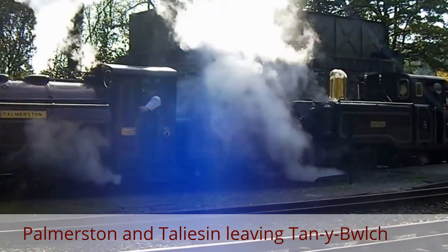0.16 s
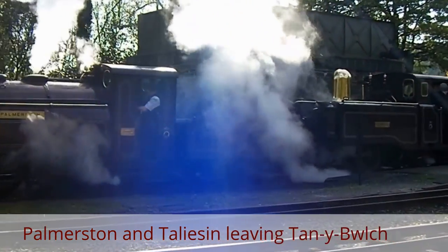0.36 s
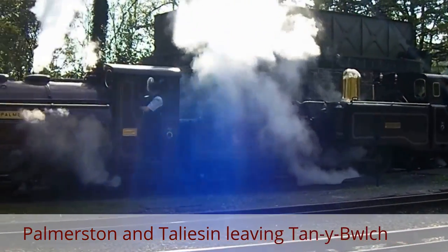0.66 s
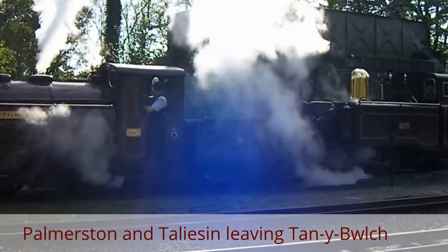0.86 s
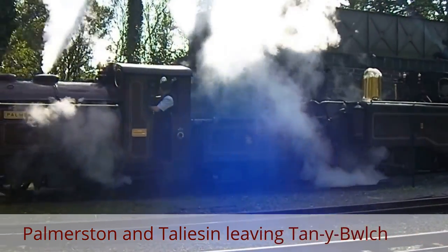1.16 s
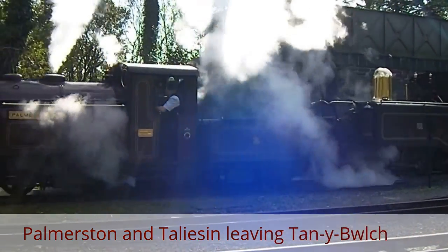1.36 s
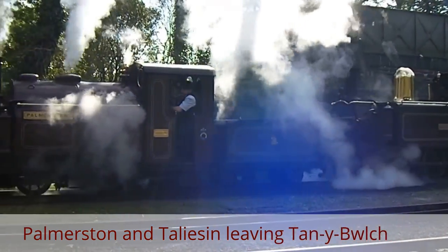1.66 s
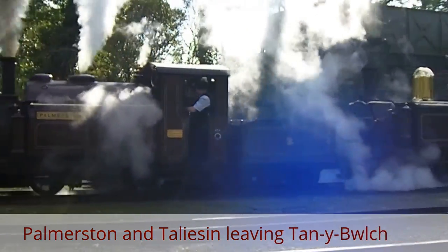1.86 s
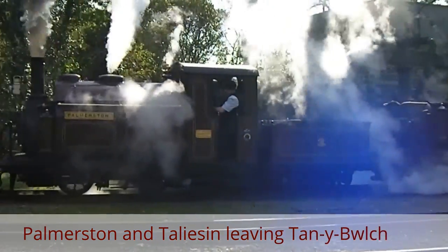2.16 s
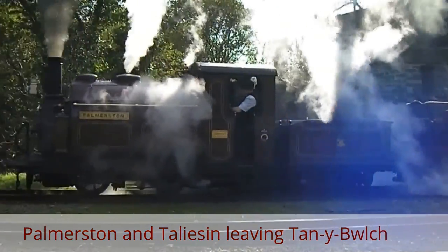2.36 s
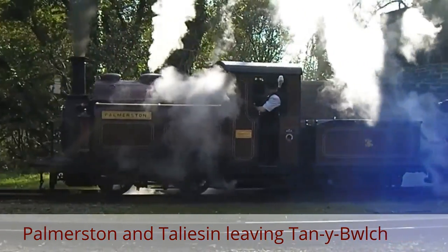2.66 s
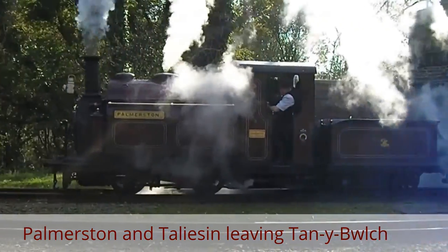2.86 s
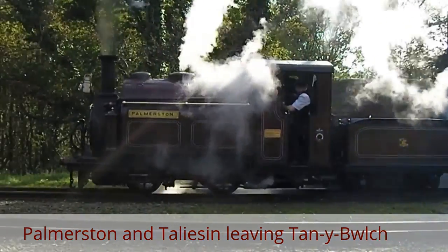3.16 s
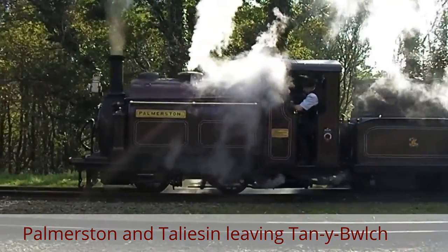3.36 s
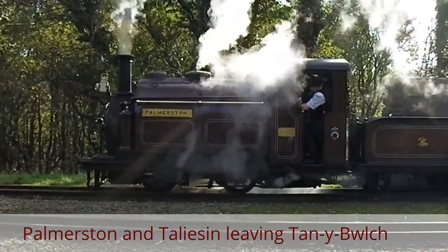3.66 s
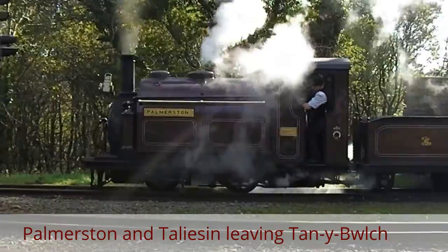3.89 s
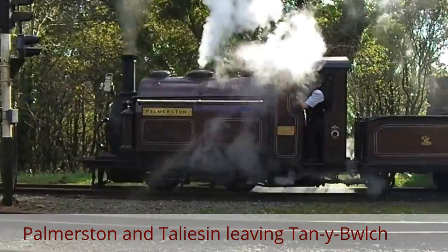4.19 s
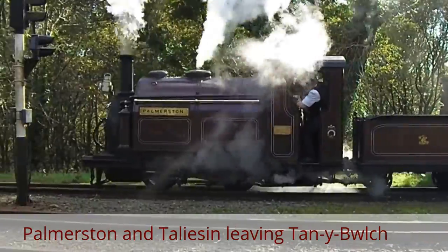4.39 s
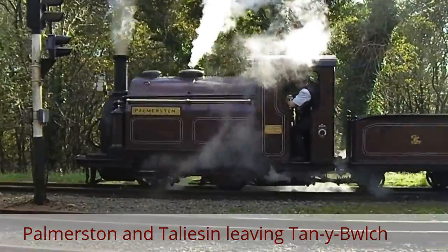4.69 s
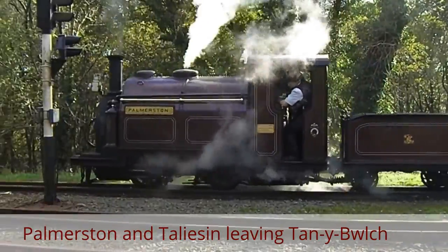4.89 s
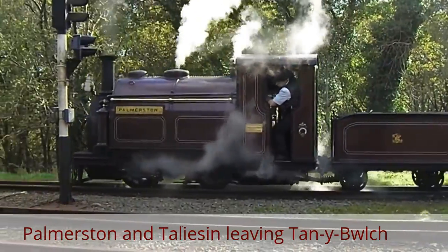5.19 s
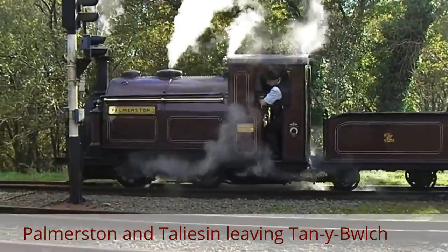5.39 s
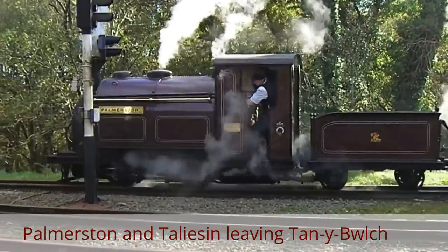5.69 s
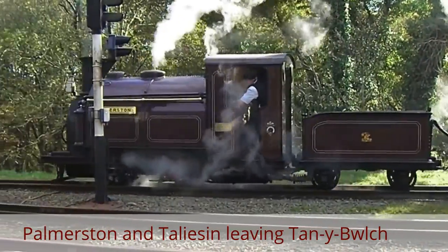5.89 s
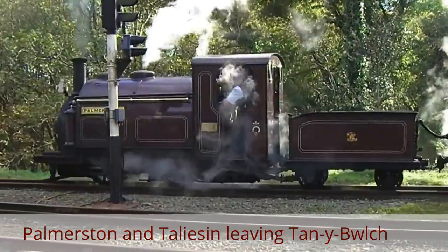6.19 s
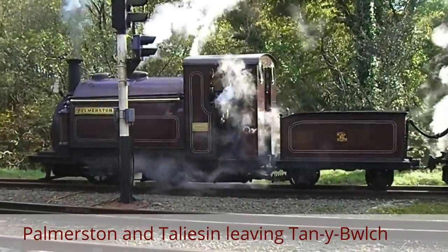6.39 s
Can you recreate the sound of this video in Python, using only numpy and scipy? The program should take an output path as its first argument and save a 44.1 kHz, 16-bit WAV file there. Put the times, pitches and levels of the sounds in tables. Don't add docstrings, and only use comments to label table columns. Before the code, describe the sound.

Two small steam engines start a train close by: dense steam hiss, a rapid slipping flurry of chuffs, then steady overlapping exhaust beats.

```python
import sys
import numpy as np
from scipy import signal
from scipy.fft import rfft, irfft, next_fast_len
from scipy.io import wavfile
from scipy.ndimage import uniform_filter1d

SR = 44100
rng = np.random.default_rng(int(sys.argv[2]) if len(sys.argv) > 2 else 0)


def voltage_ratio(decibels):
    exponent = np.asarray(decibels, float) / 20
    return 10 ** exponent


def master(y):
    cut = np.clip(np.atleast_2d(y).T, -1, 1)
    pcm = np.round(cut * 32767)
    wavfile.write(sys.argv[1], SR, pcm.astype(np.int16))


N = 288414
SIZE = next_fast_len(N)
HZ = np.maximum(np.arange(SIZE // 2 + 1) * SR / SIZE, 1)
T = np.arange(N) / SR

# [peak t/s, level/dB, fall t/s, rasp level/dB]
BEATS_LEAD = [(.062, -37.5, 0.041, -1), (.407, -33.5, 0.05, -3.5), (.878, -33.5, .048, 1.5),
              (1.108, -38.5, 0.061, 0), (2.451, -42, .025, -1), (2.926, -38, 0.048, -4),
              (3.444, -35.5, 0.038, -8), (3.94, -35.5, 0.045, -2.5), (4.375, -34, 0.068, 0),
              (4.545, -51, 0.027, 6), (4.815, -34, 0.036, -2), (5.238, -34, 0.041, -1.5),
              (5.671, -32.5, 0.044, 0), (6.075, -30.5, 0.037, 0), (6.438, -30, 0.026, -3.5)]
BEATS_REAR = [(1.334, -29.5, 0.022, 4.5), (1.485, -28.5, 0.03, 1.5), (1.609, -28.5, .033, 0.5),
              (1.716, -29.5, 0.032, 1), (1.828, -32, 0.032, 5), (1.933, -30.2, 0.035, 1.5),
              (2.049, -39.5, 0.046, 7), (2.204, -35, .021, -14), (2.375, -43.5, 0.071, -3),
              (2.87, -41, 0.057, 0), (3.296, -36, 0.042, -7), (3.648, -35.5, 0.046, -2),
              (4.049, -33.5, 0.041, -2.5), (4.41, -30, 0.03, -4), (4.769, -35, 0.088, 1),
              (5.084, -33.5, 0.039, -1.5), (5.435, -34, 0.048, 0), (5.757, -29, 0.043, -2),
              (6.045, -31.5, 0.032, -2), (6.353, -30, 0.032, -4)]
# [f/Hz, width f/Hz, level/dB]
CHIMNEY_LEAD = [(394, 115, 2), (660, 215, 0.5), (1200, 110, -6), (900, 870, -12)]
CHIMNEY_REAR = [(412, 91, 4.5), (670, 190, 0.5), (1058, 150, -2.5), (990, 1300, -10)]
THUMP = [(98, 66, -2), (185.6, 165, 1.5)]
RASP = [(1600, 170, 2.5), (2070, 1430, 1), (2840, 550, -5), (5300, 17000, -5)]
# [opens t/s, shuts t/s, cock level/dB, valve level/dB, left-right level/dB]
BLOWS_REAR = [
    (-.1, 0.09, -29.5, -32.5, 3),
    (0.083, 0.393, -31.5, -31.5, 5.5),
    (.39, 0.45, -27.5, -38, 1),
    (0.466, .66, -30.5, -32, 2),
    (0.659, 0.717, -27.5, -27.5, -1.5),
    (0.712, 1.168, -26, -24, -2),
    (1.18, 1.261, -19, -24, -6.5),
    (1.276, 1.495, -19, -26.5, -5),
    (1.503, 1.611, -18, -26, -5),
    (1.623, 2.113, -21, -26.5, -3.5),
]
# [opens t/s, shuts t/s, hiss level/dB, end swell level/dB, cock over hiss level/dB]
BLOWS_LEAD = [(2.125, 2.22, -32, 0, -5.5), (2.29, 2.33, -31, 1.5, -10), (2.37, 2.404, -32, 0.5, -4),
              (2.46, 2.68, -40, 1.5, -3), (2.69, 2.756, -30.5, -1, -4.5), (2.787, 2.996, -38, -7, -3.5),
              (3.092, 3.624, -35, 3, -3), (3.61, 3.823, -31.5, 0, -3.5), (3.868, 4.25, -36.5, 6.5, -3.5),
              (4.304, 4.467, -35.5, 3, -1), (4.52, 4.653, -33.5, 2.5, -4),
              (4.662, 4.853, -32.5, -5.5, -1.5), (4.87, 4.93, -37, 0.5, -2), (4.943, 5.392, -31, 0.5, -1.5),
              (5.39, 5.54, -26.5, -1.5, -2), (5.59, 5.7, -33, 0.5, -3), (5.735, 5.957, -31.5, 1.5, -2.5),
              (5.98, 6.103, -29.5, 1, -3), (6.124, 6.257, -31, 0.5, -3), (6.258, 6.33, -26.5, -1, -5),
              (6.343, 6.473, -34, -0.5, -1.5), (6.514, 6.7, -26, 3, -5)]
# [peak t/s, level/dB, half length t/s, f/Hz, width f/Hz]
SPITS = [(0.22, -32, 0.039, 3000, 1100), (2.204, -33.5, 0.022, 3800, 900), (2.329, -28, .016, 4170, 500),
         (2.409, -26.5, 0.011, 4260, 550), (2.513, -29.5, 0.01, 3980, 600), (2.567, -34, .012, 4080, 600),
         (2.62, -36, .011, 3900, 700), (2.73, -27, 0.025, 6240, 1600), (3.395, -38.5, .009, 1800, 600),
         (3.72, -26.5, 0.073, 6000, 2400), (3.737, -33, 0.043, 4860, 500),
         (4.332, -26.5, .0035, 3900, 1200), (4.613, -33, .019, 2920, 500), (5.077, -29, 0.092, 10900, 2400),
         (5.312, -27, 0.15, 11500, 2400), (5.507, -27.5, 0.027, 4600, 350), (5.837, -43, 0.036, 1900, 900),
         (5.943, -42, .012, 1800, 800), (6.14, -36.5, 0.026, 1900, 900), (6.02, -30, 0.033, 2900, 500),
         (6.325, -30.5, .035, 3040, 900), (6.43, -34.5, .016, 2800, 300)]
# [t/s, level/dB]
ROLLING = [(0, -52), (.08, -51), (.25, -56.5), (.6, -47.5), (.95, -61), (1.27, -61), (1.84, -49),
           (2.05, -55), (2.3, -58), (2.6, -60), (3.25, -61.5), (3.75, -59), (3.95, -51.5), (4.62, -59),
           (4.85, -48.5), (5.2, -56), (5.6, -50), (6.4, -45.5)]
# [f/Hz, level/dB, T60 t/s]
CLANK = [(1800, 11, 0.1), (2060, 0, 0.033), (3280, -11, .02)]
# [f/Hz, level/dB per Hz]
VALVE = [(2240, -33), (3800, -9), (4280, -7), (4690, -5), (5120, -5), (6180, -0.5), (7350, -5.5),
         (7960, -6), (8570, -5.5), (9500, -27), (12400, -41), (20900, -120)]
COCKS_REAR = [(3000, -23.5), (4500, -4.5), (6200, -1.5), (7400, -2.5), (8500, 2), (10200, -0.5),
              (11300, -0.5), (12700, 1.5), (15800, -3)]
COCKS_LEAD = [(5000, -31), (7000, -18), (8400, 1.5), (9400, 1), (10400, 1.5), (11500, 1), (13000, 0),
              (14200, -1.5), (15800, -3)]
LEAK = [(1400, -38), (1700, -13.5), (2300, -10), (2450, -1.5), (2900, 0.5), (3400, -1.5), (3700, -0.5),
        (4300, -6), (5400, -18)]
BLOWER = [(230, -23), (310, -19), (360, -2), (410, 1.5), (510, -7), (660, -3), (860, -8.5), (1040, -7),
          (1340, -11.5), (1650, -0.5), (2000, -3.5), (2300, -4.5), (2700, -21)]
WHEELS = [(12, -45), (20, -17), (102, 3.5), (206, -3), (270, -6.5), (350, -41), (590, -120)]
# [f/Hz, left lead phase/rad]
PHASE_LEAD = [(1500, 0), (2500, -.1), (4500, -1.5), (6000, -1.7), (8000, -2.3), (9500, -3.0), (10200, -3.9),
              (12500, -4.1), (15000, -4.4)]
PHASE_REAR = [(1500, 0), (3000, .2), (5800, -1.2), (8000, -.5), (11000, -.7), (12500, .3), (15000, .7)]
# [f/Hz, likeness/1]
LIKENESS = [(40, .9), (300, .98), (2300, .96), (3200, .76), (6500, .92), (7800, .72), (9400, .58),
            (10500, .76), (15000, .78)]
# [f/Hz, left-right level/dB]
PORTS = [(60, 1.5), (350, 1.5), (700, 3.5), (2400, 1), (3500, 5), (5500, -2), (7000, -4.5), (8500, -4.5),
         (11000, -10), (15000, -7.5)]

SLIP_S, SHUT_S = 1.2, 2.08
RISE_LEAD_S, RISE_REAR_S = 0.025, 0.023
LEFT_RIGHT = np.array([[1], [-1]])


def on_hz(table):
    hz, value = np.transpose(table)
    return np.interp(np.log(HZ), np.log(hz), value)


def modes(table):
    power = 0
    for hz, width_hz, db in table:
        power = power + (voltage_ratio(db) / (1 + ((HZ - hz * hz / HZ) / width_hz) ** 2)) ** 2
    return np.sqrt(power)


def noise(gain, phase):
    mid, side = rfft(rng.standard_normal((2, SIZE)))
    alike = np.clip(on_hz(LIKENESS), 0, 1)
    pair = np.sqrt(1 + alike) * mid + np.sqrt(1 - alike) * side * LEFT_RIGHT
    turn = (0.5j * on_hz(phase) + on_hz(PORTS) * np.log(10) / 40) * LEFT_RIGHT
    out = irfft(pair * gain * np.exp(turn), SIZE)[:, :N]
    return out / np.std(out.mean(axis=0))


def walk(rate_hz):
    hold = int(SR / rate_hz)
    steps = np.repeat(rng.standard_normal(N // hold + 1), hold)
    return 1.1 * uniform_filter1d(uniform_filter1d(steps, hold), hold)[:N]


def puffs(times_s, dbs, rises_s, falls_s, tail):
    power = np.zeros(N)
    for s, db, rise, fall in zip(times_s, dbs, rises_s, falls_s):
        near = slice(max(int((s - 4 * rise) * SR), 0), int((s + 9 * fall) * SR))
        late = T[near] - s
        onset = (np.abs(late) / (1.066 * rise)) ** 2.34
        bell = np.exp(-np.where(late < 0, onset, (late / fall) ** 2))
        linger = tail * (late > 0) * (1 - bell) * np.exp(-np.abs(late) / fall)
        power[near] += voltage_ratio(db) ** 2 * (bell + linger)
    return np.sqrt(power)


def gate(opens_s, shuts_s):
    return np.clip((T - opens_s) / 0.026, 0, 1) * np.exp(-np.maximum(T - shuts_s, 0) / 0.021)


def shimmer(x, patchy_db, hz_wide, s_long):
    hz, _, z = signal.stft(x, SR, nperseg=1024)
    field = rng.standard_normal(z.shape[1:])
    field = uniform_filter1d(field, max(int(hz_wide * 1024 / SR), 1), axis=0)
    field = uniform_filter1d(field, max(int(s_long * SR / 512), 1), axis=1)
    depth_db = patchy_db / np.sqrt(1 + (hz[:, None] / 11000) ** 2)
    return signal.istft(z * voltage_ratio(depth_db * field / np.std(field)), nperseg=1024)[1][:, :N]


def trees(near):
    t60_s, level_db = 0.62, -18.5
    late = T[:SR // 2]
    tail = rng.standard_normal((2, len(late))) * voltage_ratio(-60 * late / t60_s) * np.minimum(late / 0.02, 1)
    tail = tail * voltage_ratio(level_db) / np.sqrt(np.sum(tail ** 2, axis=1, keepdims=True))
    return signal.fftconvolve(near.mean(axis=0, keepdims=True), tail, axes=1)[:, :N]


def wheels():
    level_db = np.interp(T, *np.transpose(ROLLING)) + 1.7 * walk(6)
    return voltage_ratio(level_db) * noise(voltage_ratio(on_hz(WHEELS)), PHASE_LEAD)


def blowers():
    roar = noise(voltage_ratio(on_hz(BLOWER)), PHASE_LEAD)
    singing = voltage_ratio(-9.0) * np.clip((SLIP_S - T) / 0.14, 0, 1)
    roar = roar + singing * noise(modes([(664, 140, 0)]), PHASE_LEAD)
    duck_db = -4 * (T > SLIP_S) * np.exp(-np.abs(T - SLIP_S) / 0.3)
    rear = voltage_ratio(-38.5 + duck_db) ** 2 * np.exp(-np.maximum(T - SHUT_S, 0) / 0.088)
    nearing_db = 3 * np.maximum(T - 5.2, 0)
    lead = voltage_ratio(-47 + nearing_db) ** 2
    return np.sqrt(rear + lead) * voltage_ratio(1.6 * walk(12)) * roar


def clank():
    late = np.maximum(T - 0.524, 0)
    ring = 0
    for hz, db, t60_s in CLANK:
        ring = ring + voltage_ratio(db - 60 * late / t60_s) * np.sin(2 * np.pi * hz * late)
    tick = voltage_ratio(1 - 60 * late / 0.02) * rng.standard_normal(N) * (late > 0)
    return voltage_ratio(-33.5) * (ring * np.minimum(late / 0.0025, 1) + tick)


def spits():
    out = np.zeros((2, N))
    white = noise(np.ones_like(HZ), PHASE_LEAD)
    for s, db, half_s, hz, width_hz in SPITS:
        near = slice(max(int((s - 0.2) * SR), 0), int((s + 0.2) * SR))
        edges_hz = [hz - width_hz / 2, hz + width_hz / 2]
        band = signal.sosfilt(signal.butter(2, edges_hz, "band", fs=SR, output="sos"), white[:, near])
        out[:, near] += puffs([s], [db], [half_s], [half_s], 0)[near] * band / np.std(band)
    return out


def jet(rear_spectrum, lead_spectrum, level_db, lead, flutter_db, spatter_db):
    rear = voltage_ratio(flutter_db * walk(14)) * np.sqrt(1 - lead) * noise(voltage_ratio(on_hz(rear_spectrum)), PHASE_REAR)
    front = voltage_ratio(flutter_db * walk(14)) * np.sqrt(lead) * noise(voltage_ratio(on_hz(lead_spectrum)), PHASE_LEAD)
    return voltage_ratio(level_db + spatter_db * walk(900)) * (rear + front)


def glands(drip):
    return np.sqrt(drip) * voltage_ratio(0.73 * walk(20)) * noise(voltage_ratio(on_hz(LEAK)), PHASE_LEAD)


def safety_valves(hiss, shut):
    lead = np.clip(0.42 + 0.66 * shut, 0, 1)
    return jet(VALVE, VALVE, 10 * np.log10(hiss), lead, 0.62, 1.34)


def cylinder_cocks(top, pan_db, shut):
    cocks = jet(COCKS_REAR, COCKS_LEAD, 10 * np.log10(top) + 3.1, shut, 0.89, 0.72)
    return cocks * voltage_ratio((pan_db + 5.5) * LEFT_RIGHT / 2)


def steam():
    seep_db = -36.5
    hiss, top = voltage_ratio(seep_db) ** 2, voltage_ratio(seep_db - 3.5) ** 2
    for opens, shuts, db, swell_db, jet_db in BLOWS_LEAD:
        swelling_db = swell_db * np.clip((T - opens) / (shuts - opens), 0, 1)
        stroke = gate(opens, shuts) * voltage_ratio(db + swelling_db) ** 2
        hiss = hiss + stroke
        top = top + stroke * voltage_ratio(jet_db) ** 2
    abreast_db = 2 * np.clip((T - 5.75) / 0.078, 0, 1)
    drip = top * voltage_ratio(-2.5 + abreast_db) ** 2 + gate(-1, SHUT_S) * voltage_ratio(-36.5) ** 2
    side = top * -3.5
    for opens, shuts, jet_db, hiss_db, pan_db in BLOWS_REAR:
        blow = gate(opens, shuts) * voltage_ratio(jet_db) ** 2
        hiss = hiss + blow * voltage_ratio(hiss_db - jet_db) ** 2
        top = top + blow
        side = side + blow * pan_db
    s, db, fall, _ = np.transpose([*BEATS_LEAD, *BEATS_REAR])
    drip = drip + puffs(s, db - 14, 0 * s + RISE_LEAD_S, 0.81 * fall, 0) ** 2
    shut = np.clip((T - SHUT_S) / 0.12, 0, 1)
    return cylinder_cocks(top, side / top, shut) + safety_valves(hiss, shut) + glands(drip)


def exhaust(beats, chimney, rise_s, thump_db):
    s, db, fall, rasp_db = np.transpose(beats)
    rise = np.full_like(s, rise_s)
    gusty = voltage_ratio(0.93 * walk(60))
    pipe = puffs(s, db, rise, 0.83 * fall, 0.13) * noise(modes(chimney), PHASE_LEAD)
    thump = puffs(s + 0.006, db + thump_db, 1.1 * rise, fall, 0.16) * noise(modes(THUMP), PHASE_LEAD)
    rasp_env = puffs(s, db + rasp_db + 2.5, 0.9 * rise, 0.75 * fall, 0.25)
    rasp = rasp_env * noise(modes(RASP), PHASE_LEAD)
    return gusty * (pipe + thump + rasp)


def scene():
    beats = exhaust(BEATS_LEAD, CHIMNEY_LEAD, RISE_LEAD_S, thump_db=-10)
    beats = beats + exhaust(BEATS_REAR, CHIMNEY_REAR, RISE_REAR_S, thump_db=-10.5)
    near = shimmer(beats, patchy_db=1.5, hz_wide=140, s_long=0.035) + clank()
    bed = shimmer(steam() + blowers() + wheels(), patchy_db=3.0, hz_wide=70, s_long=0.075)
    return near + trees(near) + spits() + bed


def low_pass(x):
    return signal.sosfilt(signal.butter(12, 15860, fs=SR, output="sos"), x)


def record(dry):
    notch_hz, notch_width_hz, top_hz = 7860, 480, 15815
    notch = signal.iirnotch(notch_hz, notch_hz / notch_width_hz, SR)
    notched = signal.lfilter(*notch, np.tanh(0.84 * dry) / 0.96)
    mix = irfft(rfft(notched, SIZE) * (HZ < top_hz), SIZE)[:, :N]
    return low_pass(mix)


dry = scene()
out = record(dry)
master(out)
```